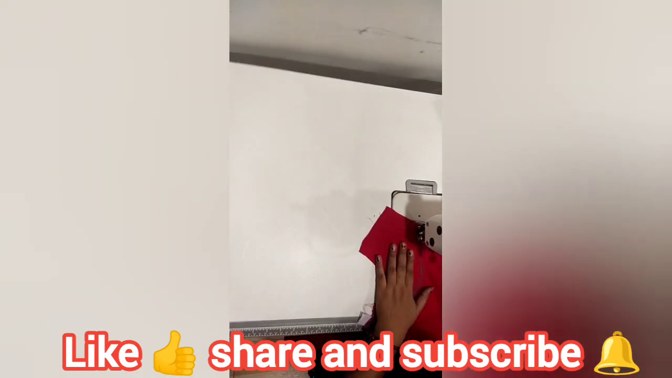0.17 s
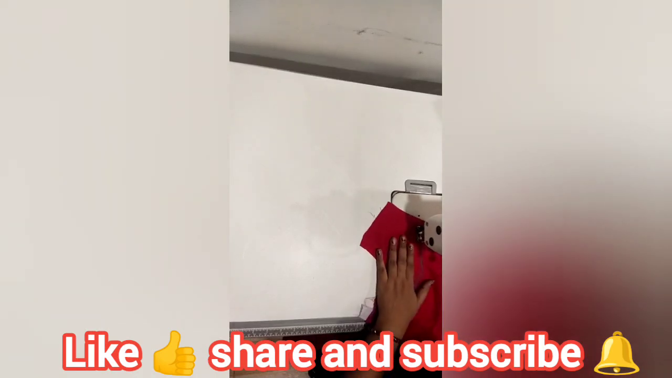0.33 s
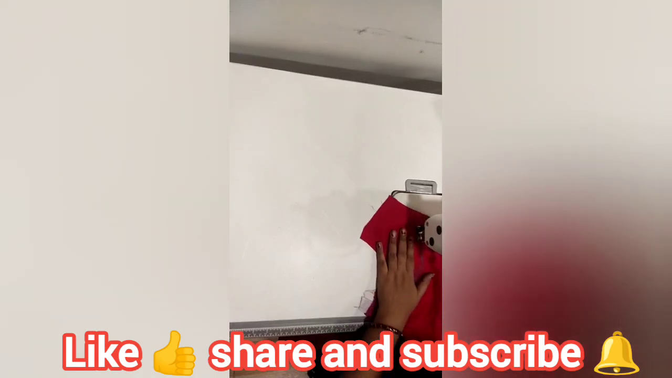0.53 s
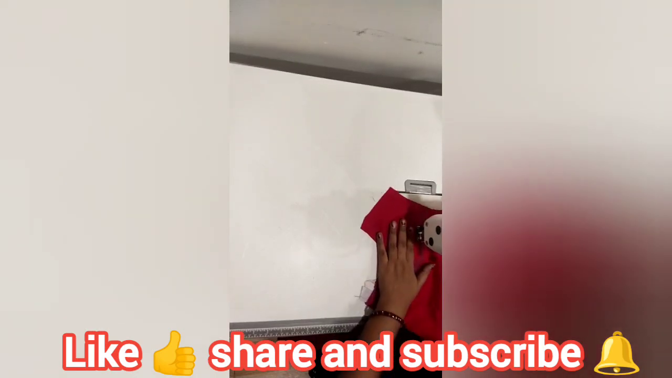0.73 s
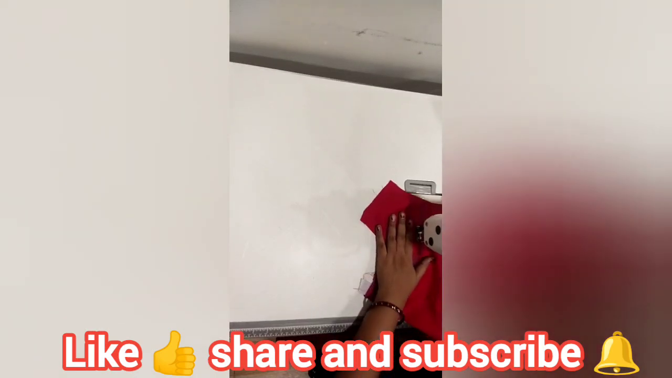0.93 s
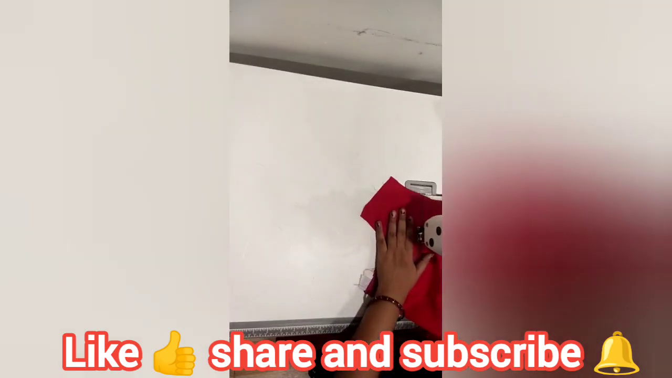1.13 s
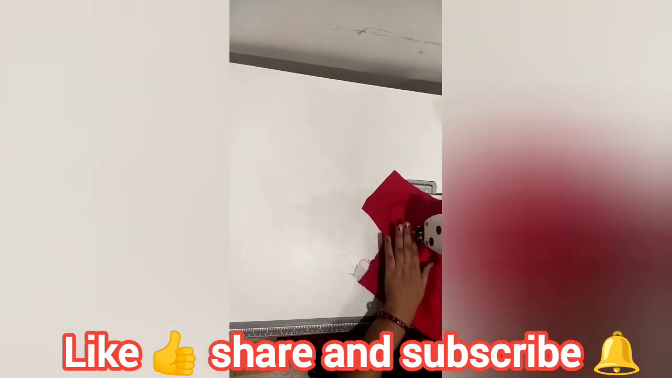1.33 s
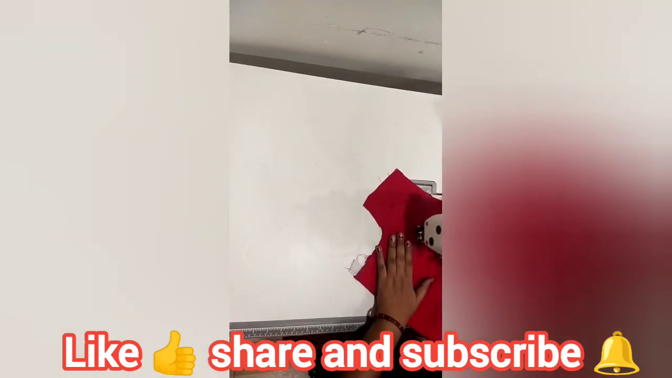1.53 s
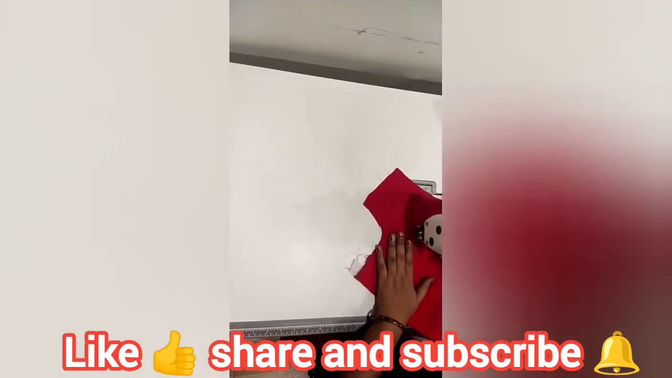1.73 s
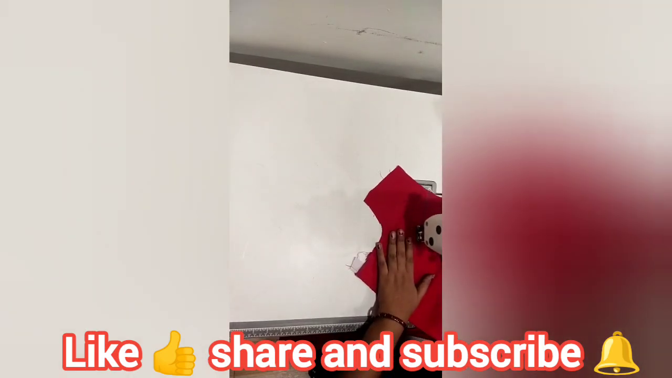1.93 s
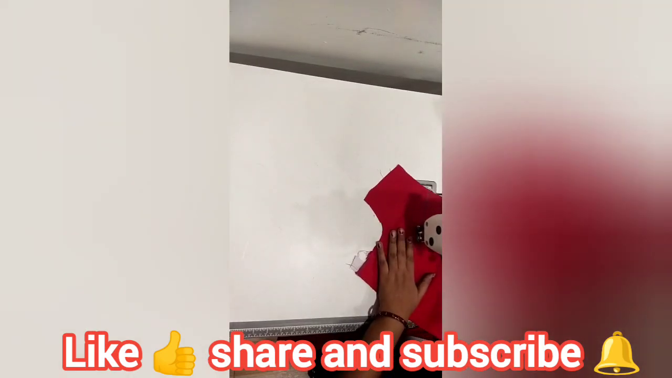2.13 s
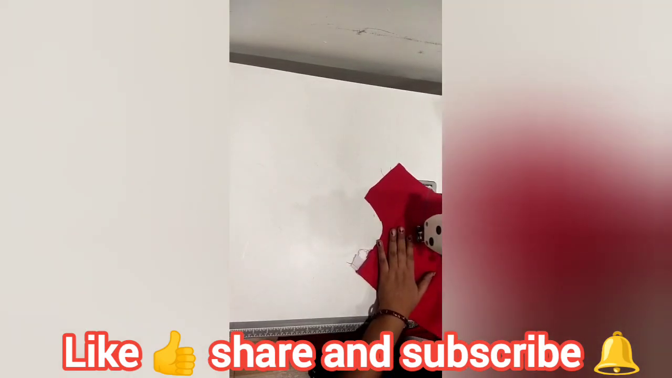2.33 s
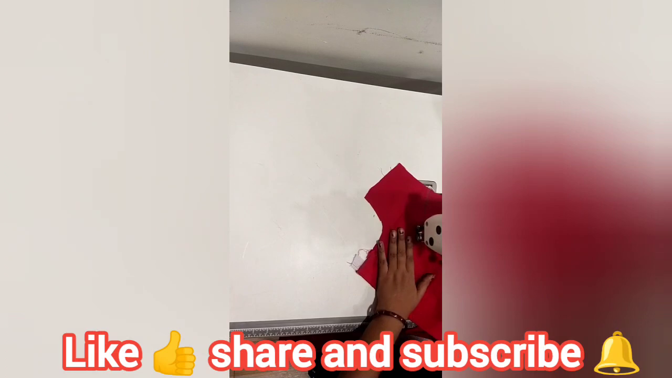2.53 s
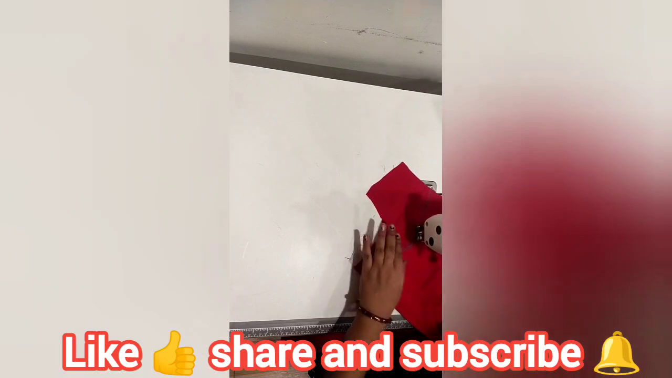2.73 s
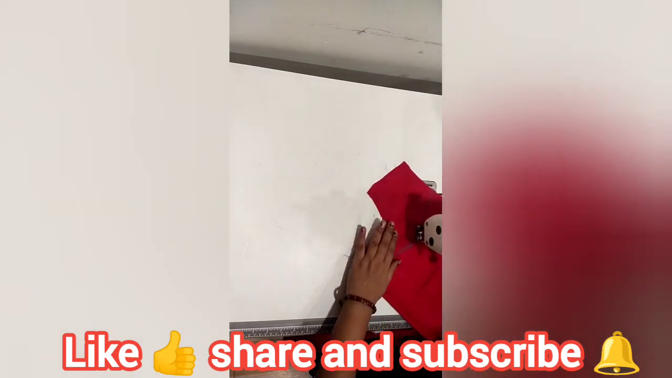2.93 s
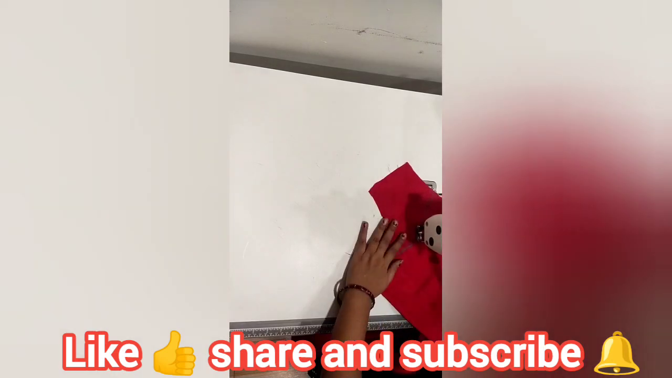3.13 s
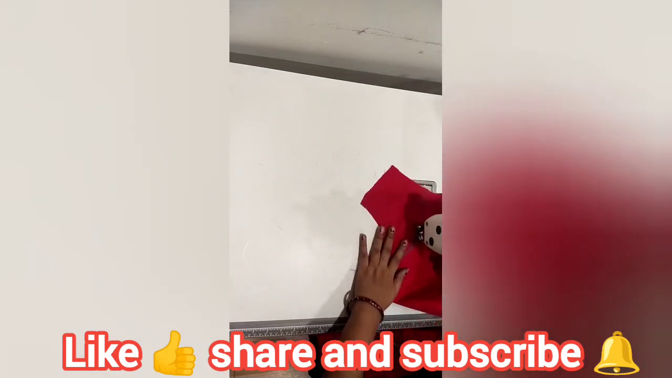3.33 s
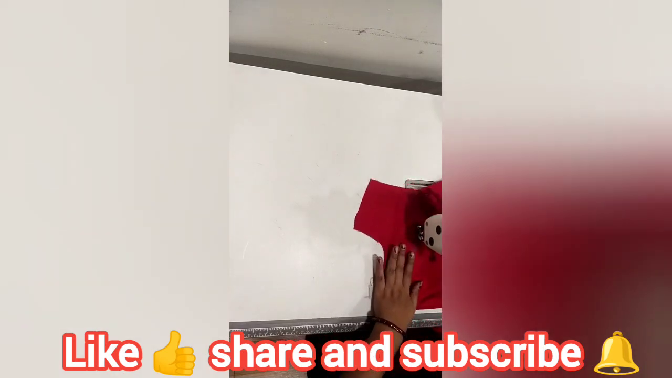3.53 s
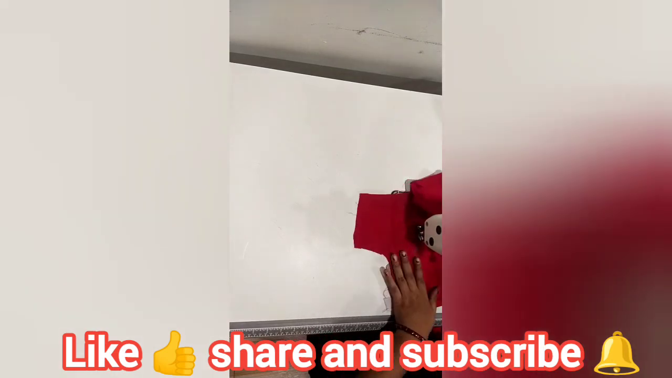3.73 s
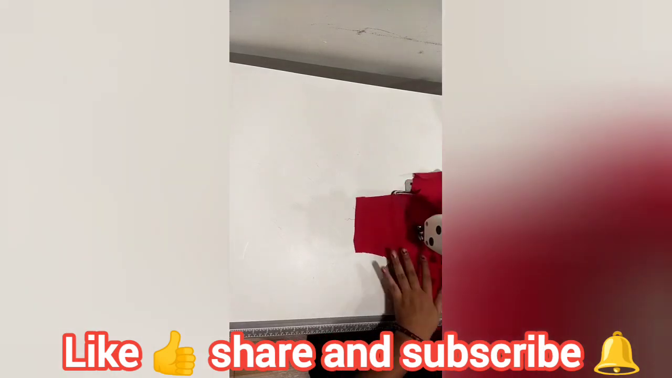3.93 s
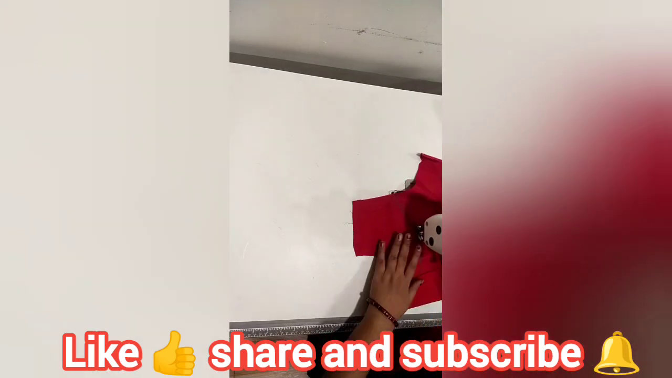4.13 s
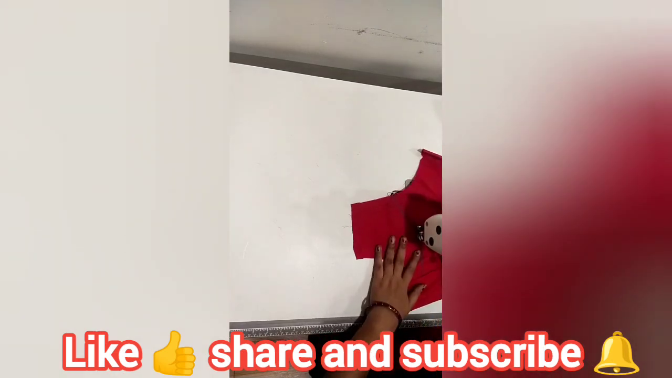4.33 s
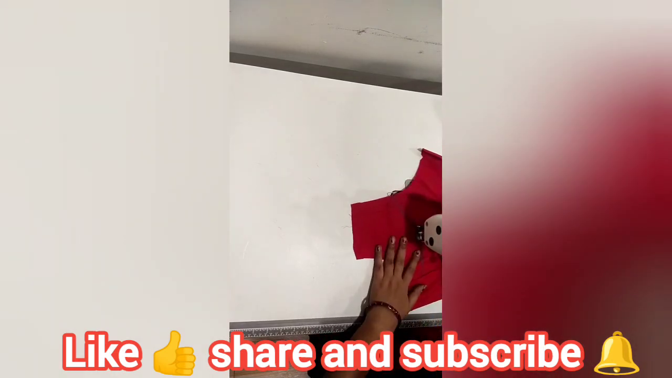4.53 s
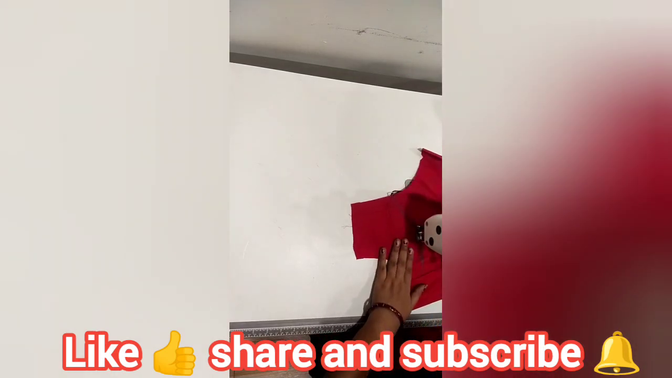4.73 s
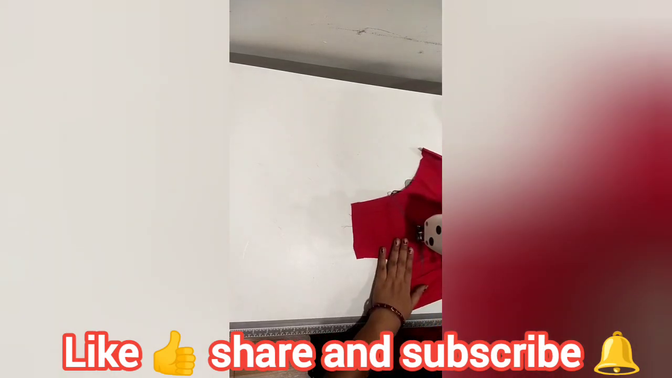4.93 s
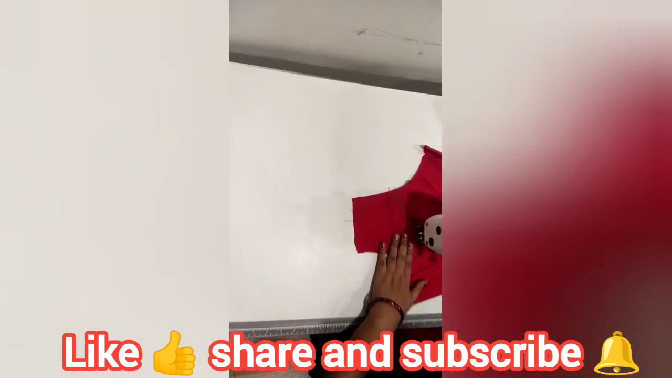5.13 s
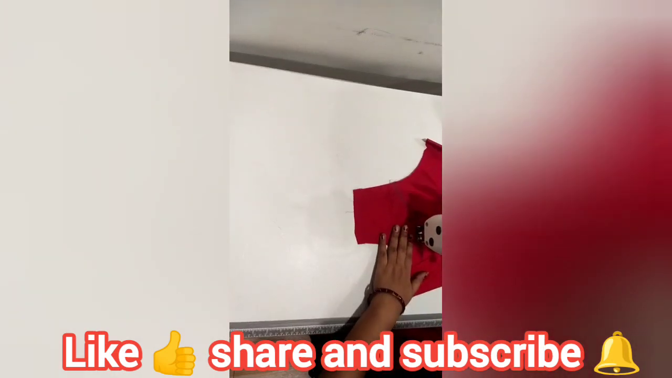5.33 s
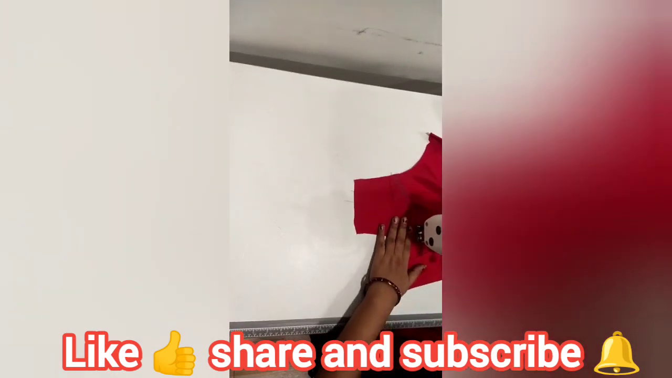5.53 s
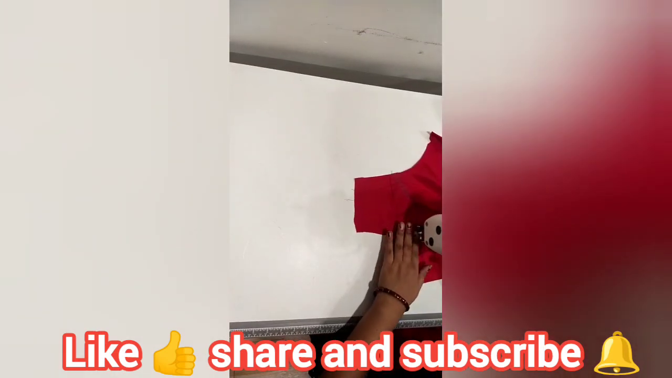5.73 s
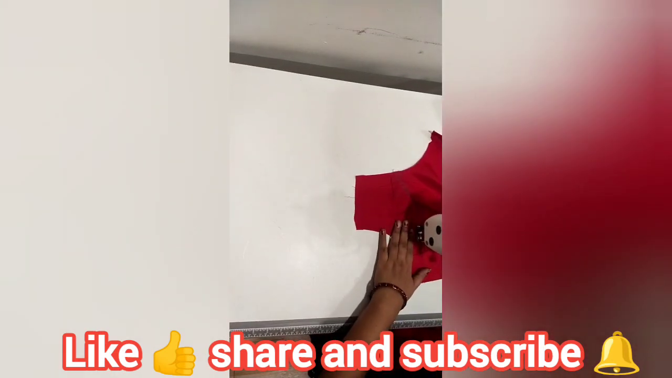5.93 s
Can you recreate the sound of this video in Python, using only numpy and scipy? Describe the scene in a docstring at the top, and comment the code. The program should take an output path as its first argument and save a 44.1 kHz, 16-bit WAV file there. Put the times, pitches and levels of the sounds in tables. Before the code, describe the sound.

Fast metallic stitching slows to a stop, a presser foot clacks, hands bump the table and slide fabric, then two brief motor runs follow.

```python
"""Sewing machine runs

An electric sewing machine on a table in a small room: one long run, a few slow stitches, then two short runs.
The motor drive is a sum of sine waves that hums through the table; the loose linkage is dense, patterned noise.
The needle bar ticks with short bursts of bright noise. Between the runs the presser foot clacks, hands bump
the table and knock the machine (noise and dying sine waves), cloth slides (shaped noise) and something squeaks.
"""
import sys
import numpy as np
from scipy import signal
from scipy.fft import rfft, irfft, next_fast_len
from scipy.io import wavfile
from scipy.ndimage import uniform_filter1d, map_coordinates

SR = 44100
rng = np.random.default_rng(int(sys.argv[2]) if len(sys.argv) > 2 else 0)


def wav_record(signal):
    """Record a signal, one row per channel, as 16-bit PCM in the file named by sys.argv[1]."""
    frames = np.transpose(np.atleast_2d(signal))
    bounded = np.clip(frames, -1, 1)
    # unit amplitude maps onto the largest positive 16-bit level
    quanta = np.round(bounded * 32767).astype(np.int16)
    wavfile.write(sys.argv[1], SR, quanta)


N = 267687


def amp(db):
    """Decibels to gain."""
    return 10 ** (np.asarray(db) / 20)


def unit(x):
    """Scale x to an rms of 1."""
    return x / np.sqrt(np.mean(x ** 2) + 1e-20)


def along(points, hz):
    """Read a curve of (f/Hz, value) points, with frequency on a log axis."""
    f, values = np.transpose(points)
    return np.interp(np.log(hz + 1), np.log(f + 1), values)


def wobble(rate):
    """A smooth random curve with a new random value `rate` times a second."""
    return map_coordinates(rng.standard_normal(int(N * rate / SR) + 4), [np.arange(N) * rate / SR])


def filtered(x, response):
    """Change the loudness or timing of each frequency in x."""
    padded = next_fast_len(x.shape[-1] + 8192)
    spectrum = rfft(x, padded) * response(np.fft.rfftfreq(padded, 1 / SR))
    return irfft(spectrum, padded)[..., :x.shape[-1]]


# How alike the left and right sides are: (f/Hz, likeness from 0 to 1)
LIKENESS = [(60, 1), (160, 1), (350, 0.87), (600, 1), (1000, 0.134), (2200, 0.25), (5000, 0.092),
            (15000, 0.26)]


def voiced(pair, spectrum, resonances=()):
    """Colour two unrelated sounds and mix them into a left and right pair of rms 1."""
    def response(hz):
        turn = np.arccos(np.clip(along(LIKENESS, hz), -1, 1)) / 2
        lift = sum(db / (1 + (2 * (hz - centre) / width) ** 2) for centre, width, db in resonances)
        return amp(along(spectrum, hz) + lift) * [np.cos(turn), np.sin(turn)]
    mid, side = filtered(pair, response)
    return unit(np.array([mid + side, mid - side]))


def noise(spectrum, size=N):
    """Stereo noise of rms 1 with the given spectrum."""
    return voiced(rng.standard_normal((2, size)), spectrum)


def panned(db):
    """Left and right gains; a positive value makes the left louder."""
    return amp(np.array([[.5], [-.5]]) * db)


def add(track, s, sound):
    """Mix a sound into the track at time s, in seconds."""
    part = track[:, max(round(s * SR), 0):][:, :sound.shape[-1]]
    part += sound[..., :part.shape[-1]]


# How long the room takes to fade by 60 dB: (f/Hz, fade time/s)
ROOM_FADE = [(150, 0.34), (600, 0.57), (2500, 0.39), (7000, 0.26), (15000, 0.17)]


def in_room(x, wet_db):
    """Add a new random room tail in which each frequency dies at its own speed."""
    hz, t, z = signal.stft(rng.standard_normal((2, SR // 2)), SR, nperseg=256)
    fading = z * amp(-60 * t / along(ROOM_FADE, hz)[:, None])
    tail = voiced(signal.istft(fading, SR, nperseg=256)[1], [(1, 0)])  # a flat spectrum
    tail = tail * (1 - np.exp(-np.arange(tail.shape[1]) / SR / 0.0063))
    wet = signal.fftconvolve(x, tail / np.linalg.norm(tail[0]), axes=1)
    return x + amp(wet_db) * wet[:, :x.shape[1]]


def ramp(start, full, release, stop):
    """An effort that rises evenly, holds, and runs down evenly, within 0 to 1."""
    t = np.arange(N) / SR
    return np.clip(np.minimum((t - start) / (full - start), (stop - t) / (stop - release)), 0, 1)


def arch(middle, length):
    """A smooth swell from nothing to 1 and back."""
    return np.cos(np.pi * np.clip((np.arange(N) / SR - middle) / length, -.5, .5)) ** 2


# The spectrum of the room's faint rush: (f/Hz, relative level/dB)
AIR_TONE = [(15, -51.5), (25, -21), (169, 1.5), (469, -7), (537, -7.5), (945, -10), (2630, -19),
            (5580, -31), (7100, -28), (8580, -36.5), (15500, -37)]


def room_rush():
    """Steady shaped noise stands for the faint rush of the room."""
    return amp(-61.0) * noise(AIR_TONE)


# Runs of the motor: (pedal down t/s, up to speed t/s, pedal up t/s, at rest t/s,
#                     top effort 0-1, speed/turns per s, one needle stroke t/s)
RUNS = [(-0.42, 0.193, 0.57, 1.2, 0.99, 13.28, 0.324), (4.821, 5.048, 5.326, 5.625, 0.95, 13.36, 5.096),
        (5.856, 6.12, 6.3, 6.6, 0.99, 13.4, 6.03)]


def motor_effort():
    """The motor's effort rises after the pedal goes down and falls after it comes up."""
    return sum(top * ramp(*times) for *times, top, _, _ in RUNS)


SAG_TURNS_PER_S = 0.3  # how much slower the drive turns at no effort
DROOP_TURNS_PER_S2 = 0.3  # the cloth drags the speed down, for up to 1 s after full speed


def shaft_turns(effort):
    """Turns made so far: each run has its own speed, which sags with low effort and with time."""
    t, speed = np.arange(N) / SR, np.zeros(N)
    for start, full, *_, rate, _ in RUNS:
        run_speed = rate - DROOP_TURNS_PER_S2 * np.clip(t - full, 0, 1)
        speed = np.where(t >= start, run_speed, speed)
    return np.cumsum(speed - SAG_TURNS_PER_S * (1 - effort)) / SR


RING_ON_S = 0.057  # time constant with which machine and room ring on


def driven(effort, db, power, tail_db):
    """The gain of a part that grows as a power of the effort and rings on after it."""
    energy, keep = effort ** (2 * power), np.exp(-1 / (RING_ON_S * SR))
    ringing = signal.lfilter([1 - keep], [1, -keep], energy)
    return amp(db) * np.sqrt(energy + amp(tail_db) ** 2 * ringing)


# Low and high vibration of the drive: (multiple of the turn rate, relative level/dB, left minus right/dB)
LOW_HUM = [(5, -19.5, -3), (10, -10, 18), (12, -8.5, 3), (13, 1.5, -2), (14, -6.5, 0.5), (15, -20.5, 9),
           (23, 4, -6.5)]
HIGH_HUM = [(28, 0, 0.5), (33, -11.5, -20), (37, -8, -1.5), (40, -11.5, -4.5), (41, 1.5, -2),
            (43, -11, -13), (46, -11.5, 14.5), (51, -14, -3.5)]
HUM_LAG_S = 0.029  # the high hum follows the effort this much later


def hum(turns, effort):
    """Unbalanced parts shake the table at multiples of the turn rate; high ones grow more steeply with effort."""
    t = np.arange(N) / SR
    late_effort = np.interp(t - HUM_LAG_S, t, effort)
    low = driven(effort, db=-43.5, power=1.7, tail_db=-4.5)
    high = driven(late_effort, db=-40, power=2.9, tail_db=-18.5)
    out = np.zeros((2, N))
    for level, orders in ((low, LOW_HUM), (high, HIGH_HUM)):
        for order, db, pan_db in orders:
            # both pitch and loudness are a little unsteady
            phase = 2 * np.pi * (order * turns + rng.random()) + 0.3 * wobble(14)
            out += panned(pan_db) * level * amp(db + 0.59 * wobble(22)) * np.sin(phase)
    return out


# Wave counts that make up the pattern of joint strikes: (waves per turn)
CHATTER_ORDERS = (3, 5, 7, 8, 10)


def chatter(turns):
    """The joints strike in the same pattern in every turn."""
    return unit(sum(np.cos(2 * np.pi * (order * turns + rng.random())) for order in CHATTER_ORDERS))


def contacts(pattern, swing_db, density, grain):
    """Noise and random tiny impacts (density per second) grow louder and softer with the pattern of the turn."""
    sparse = (rng.random(N) < density / SR) * rng.standard_normal((2, N))
    return amp(swing_db * pattern) * (rng.standard_normal((2, N)) + grain * unit(sparse))


def patches(x, depth_db, size=5):
    """The energy is shared among the frequencies anew all the time, so the colour flickers."""
    z = signal.stft(x, nperseg=1024)[2]
    over_hz = uniform_filter1d(rng.standard_normal(z.shape[1:]), size, 0)
    field = uniform_filter1d(over_hz, 3, 1)  # smoothed over time too
    return unit(signal.istft(z * amp(depth_db * unit(field)), nperseg=1024)[1][:, :N])


def near_walls(x, echo_db, spread, count=8):
    """Table top, casting and walls send a few early copies to each side, combing the spectrum."""
    out = x.copy()
    for side in range(2):
        delays = rng.uniform(.001, spread, count)  # seconds
        for delay, sign in zip(delays, rng.choice([-1, 1], count)):
            out[side] += sign * amp(echo_db) * np.pad(x[side], (round(delay * SR), 0))[:N]
    return out / np.sqrt(1 + count * amp(echo_db) ** 2)


# Spectra of the steel rattle, the casting and the drumming table: (f/Hz, relative level/dB)
RATTLE_TONE = [(2500, -34), (4000, -3), (5000, 1), (5900, -4), (7300, 3.5), (8800, -6), (9900, -6.5),
               (11200, -5.5), (13500, -7), (15000, -3), (16000, -21.5)]
CASTING_TONE = [(400, -17.5), (750, -3), (1100, -4), (1700, 1), (2200, -2.5), (3000, -1), (4300, -4),
                (5500, -25.5), (9000, -32)]
TABLE_TONE = [(25, -23), (52, -16), (68, -4.5), (100, -2.5), (140, -1.5), (180, 6.5), (230, -7.5),
              (300, -10.5), (480, -6.5), (580, 4.5), (720, -11.5), (1100, -22), (3000, -65.5)]
# Resonances of the machine bed: (f/Hz, width/Hz, lift/dB)
BED_RESONANCES = [(170.4, 8.3, -1.5), (293.7, 37, 16.5), (390, 40, 6.5), (600, 36, 3), (640, 65, 0.5)]


def linkage(turns, effort, resonances, rattle_db, casting_db, table_db, uneven_db):
    """The loose linkage rattles, rings the casting and drums on the table, with an uneven level."""
    rattle = driven(effort, rattle_db, power=1.286, tail_db=-25)
    casting = driven(effort, casting_db, power=1.124, tail_db=-12)
    # at speed most of the table's motion goes into the hum, so its drumming grows more slowly
    drumming = driven(effort, table_db, power=0.85, tail_db=-4)
    pattern = chatter(turns)
    steel_hits = contacts(pattern, swing_db=0.95, density=1800, grain=0.82)
    body_hits = contacts(pattern, swing_db=0.85, density=600, grain=0.58)
    wood_hits = contacts(pattern, swing_db=1.0, density=220, grain=0.34)
    steel = rattle * patches(voiced(steel_hits, RATTLE_TONE, resonances), depth_db=2.5)
    body = casting * patches(voiced(body_hits, CASTING_TONE, resonances), depth_db=2.5)
    wood = drumming * voiced(wood_hits, TABLE_TONE, BED_RESONANCES + resonances)
    return amp(uneven_db * wobble(35)) * (near_walls(steel + body, echo_db=-17.5, spread=.02) + wood)


# Ringing metal in the fast runs: (f/Hz, width/Hz, lift/dB)
FAST_RESONANCES = [(995, 30, 1.5), (1460, 46, 5), (1802, 36, 8), (2020, 20, -0.5), (2630, 81, 7.5),
                   (2972, 34, 12), (3400, 77, 3.5), (4540, 95, 6.5), (5213, 40, 2), (7270, 26, -8.5),
                   (8660, 120, 3.5), (8850, 150, 9.5)]


def fast_linkage(turns, effort):
    """The motor drives the linkage at speed, so the rattle is fairly even."""
    return linkage(turns, effort, FAST_RESONANCES,
                   rattle_db=-35, casting_db=-35.5, table_db=-40.5, uneven_db=0.27)


# Needle bar ticks in every turn at speed: (share of the turn, relative level/dB at full effort)
STROKE = [(0.0, -20.5), (0.39, -25.5), (0.6, -24)]
STROKE_SCATTER_DB = 2
STROKE_MIN_EFFORT = 0.66  # the regular ticks need more effort than this


def stroke_ticks(turns, effort):
    """In a fast run the needle bar ticks at the same places in every turn: (t/s, level/dB, left minus right/dB)."""
    t, rows = np.arange(N) / SR, []
    for start, _, _, stop, *_, stroke_s in RUNS:
        fast = (t > start) & (t < stop) & (effort > STROKE_MIN_EFFORT)
        angle = turns - np.interp(stroke_s, t, turns)
        for share, db in STROKE:
            passes = np.flatnonzero((np.diff(np.floor(angle - share)) > 0) & fast[1:])
            for i in passes:
                level = db + 20 * np.log10(effort[i]) + rng.normal(0, STROKE_SCATTER_DB)
                rows.append((t[i], level, 0))
    return rows


# Single ticks as the slow linkage takes up its play: (t/s, relative level/dB, left minus right/dB)
SLOW_TICKS = [(0.8844, -29, -8), (0.945, -37, -11), (0.9866, -34, -8), (0.995, -35, -9), (1.0837, -33, -1),
              (1.5703, -34, 0), (1.6217, -34, -2), (1.7595, -26.5, -3), (1.7818, -25.5, 0),
              (1.8761, -30.5, 2), (1.931, -28.5, 0), (1.9485, -33.5, -5), (1.9928, -25, -1.5),
              (2.0868, -26, -3), (2.2193, -41.5, 2), (4.487, -59, 0), (4.8121, -37.5, 5), (4.8615, -29, 0),
              (4.8911, -25.5, 1), (4.9432, -21, 4), (5.4829, -24, -1), (5.8799, -31, 1), (5.9575, -31, 2),
              (5.9954, -26.5, -3)]
# The spectrum of a tick: (f/Hz, relative level/dB)
TICK_TONE = [(300, -35.5), (1200, -6.5), (3000, -4), (5500, -7.5), (7200, 0.5), (8000, -2), (8700, 5.5),
             (9900, -16), (11000, -6), (13000, -13), (15000, -2), (16500, -22.5)]


def ticks(turns, effort):
    """Steel meets steel: a few milliseconds of bright noise, with a room tail."""
    out, t = np.zeros((2, N)), np.arange(SR // 20) / SR
    for s, db, pan_db in SLOW_TICKS + stroke_ticks(turns, effort):
        shape = (1 - np.exp(-t / 0.0008)) * amp(-60 * np.maximum(t - .0025, 0) / 0.025)
        add(out, s, amp(db - 6.5) * panned(pan_db) * shape * noise(TICK_TONE, size=len(t)))
    return in_room(out, wet_db=-6)


# Light knocks on the machine bed: (t/s, relative level/dB, ringing f/Hz, time to fade 60 dB/s)
KNOCKS = [(1.157, -43, 680, 0.058), (1.782, -50, 375, 0.062), (1.83, -45, 400, 0.092),
          (1.877, -46.5, 377, 0.08), (2.133, -48.5, 597, 0.19), (2.620, -50, 544, 0.16),
          (2.85, -49, 326, 0.13), (3.609, -36.5, 475, 0.021), (4.306, -43.5, 550, 0.038),
          (4.496, -44.5, 542, .04), (4.632, -33.5, 594, 0.049), (4.921, -37.5, 569, 0.21),
          (5.469, -32, 581, 0.11)]
# The spectrum of the dull tap: (f/Hz, relative level/dB)
KNOCK_TONE = [(30, -40), (100, -16), (330, 3), (700, -10), (1100, -13), (2200, -26.5), (6000, -41),
              (15000, -61)]


def knocks():
    """A dull tap of noise with one short ring of the bed."""
    out, t = np.zeros((2, N)), np.arange(SR // 2) / SR
    for s, db, hz, fade_s in KNOCKS:
        ring = amp(3 - 60 * t / fade_s) * np.sin(2 * np.pi * hz * t)
        tap = amp(-6.5 - 60 * t / 0.054) * noise(KNOCK_TONE, size=len(t))
        onset = 1 - np.exp(-t / 0.0025)
        add(out, s, amp(db) * (onset * ring + in_room(onset * tap, wet_db=3.5)))
    return out


# The presser foot and its lever: (t/s, relative level/dB, brightness/dB per tenfold frequency)
CLACKS = [(1.359, -31.5, -4.5), (1.4, -30, 5), (1.418, -38.5, 6), (1.428, -43, 3), (1.476, -46, 10),
          (2.843, -43, 8), (2.855, -42, 0.5), (2.871, -41.5, 2.5), (4.071, -34, 12.5), (4.092, -33.5, 11),
          (4.112, -37.5, -9), (4.131, -39, 6), (4.217, -41.5, -4)]
# The spectrum of the lever's crack: (f/Hz, relative level/dB)
LEVER_TONE = [(30, -50), (90, -24), (170, -5), (350, -9), (850, -2), (1050, -17.5), (1450, -14.5),
              (1850, -5.5), (2600, -9), (3200, -22), (3600, -16), (4600, -21.5), (5800, -33), (7500, -22.5),
              (9800, -39.5), (15000, -39)]
# Ringing modes of the machine head: (f/Hz, relative level/dB, time to fade 60 dB/s)
HEAD_MODES = [(296.7, 0.5, 0.18), (386, -3, 0.44), (466, -38, 0.37), (550, -4.5, 0.4), (657, -3, 0.22),
              (816, 1.5, 0.16), (855, -17, 0.64), (1268.5, -11.5, 1), (1850, -16, 0.2), (2410, -6.5, 0.15),
              (2510, -7, 0.12), (2695, -21, 0.26), (3680, -14, 0.17)]


def clacks():
    """The presser foot snaps against its stop and bounces; the whole head rings."""
    out, t = np.zeros((2, N)), np.arange(SR // 2) / SR
    for s, db, bright_db in CLACKS:
        tone = [(hz, level + bright_db * np.log10(hz / 1000)) for hz, level in LEVER_TONE]
        # the foot chatters on its stop for a moment before it lets go
        crack = amp(-2.0 - 60 * np.maximum(t - .003, 0) / 0.018) * noise(tone, size=len(t))
        ring = np.zeros((2, len(t)))
        for hz, level, fade_s in HEAD_MODES:
            # each mode has its own strength and reaches the two sides a little out of step
            fade = amp(level + rng.normal(0, 1.93) - 60 * t / fade_s)
            ring += fade * np.sin(2 * np.pi * (hz * t + rng.random()) + rng.normal(0, 0.39, (2, 1)))
        onset = 1 - np.exp(-t / 0.002)
        add(out, s, amp(db) * (in_room(onset * crack, wet_db=1.5) + amp(-12) * onset * ring))
    return out


# The wheel is eased round slowly: (starts t/s, moving t/s, let go t/s, at rest t/s, effort level/dB)
INCHES = [(1.52, 1.54, 1.62, 2.13, -19.5), (1.732, 1.817, 1.914, 2.187, -10), (2.077, 2.1, 2.084, 2.3, -12),
          (4.73, 4.748, 4.82, 8.1, -26), (5.497, 5.58, 5.6, 5.75, -36)]
# Ringing metal in the slow stitches: (f/Hz, width/Hz, lift/dB)
SLOW_RESONANCES = [(319, 140, 10.5), (554, 85, 7), (1305, 190, 18), (1790, 48, 7), (3110, 820, 11),
                   (3830, 47, 8.5), (5040, 44, 7), (6200, 56, 7), (6800, 52, 12), (7400, 300, 2),
                   (8400, 206, 10)]


def slow_linkage(turns):
    """The wheel is eased round, and the linkage rattles much more unevenly than at speed."""
    easing = sum(amp(db) * ramp(*times) for *times, db in INCHES)
    return linkage(turns, easing, SLOW_RESONANCES,
                   rattle_db=-32.0, casting_db=-36.5, table_db=-47, uneven_db=2.28)


# Slides of cloth and hand: (middle t/s, length/s, relative hiss level/dB, relative rub level/dB)
SLIDES = [(2.302, 0.9, -73.5, -60), (2.754, 0.57, -81.5, -62), (3.334, 1.3, -67, -68.5),
          (3.28, 0.52, -90, -55.5), (4.334, 0.36, -85, -52), (4.653, 0.68, -79, -55.5)]
# Spectra of the hiss and the rub: (f/Hz, relative level/dB)
CLOTH_HISS = [(1200, 4.5), (3300, -3.5), (5000, -6.5), (6800, 0.5), (8200, -2.5), (12000, -7),
              (15200, -2.5)]
CLOTH_RUB = [(35, -63), (60, -42), (139, 1), (263, -27), (308, -8.5), (330, -21), (702, -14.5), (1980, -32),
             (4000, -37), (5200, -37), (8800, -120)]


def cloth():
    """Cloth and hand slide over the smooth table top: an even hiss and a more uneven rub."""
    hiss = sum(amp(db) * arch(middle, length) for middle, length, db, _ in SLIDES)
    rub = sum(amp(db) * arch(middle, length) for middle, length, _, db in SLIDES)
    hissing = hiss * amp(5 + 0.8 * wobble(25)) * noise(CLOTH_HISS)
    rubbing = rub * amp(-4 + 3.0 * wobble(18)) * noise(CLOTH_RUB)
    return hissing + rubbing


# Soft bumps on the table: (t/s, relative level/dB, pitch factor)
BUMPS = [(2.173, -31.5, 1.02), (2.242, -39.5, 1.1), (2.349, -32.5, 1.04), (2.383, -36, 1.06),
         (2.439, -39.5, 1.0), (2.567, -33.5, 1.02), (2.603, -42, 1.05), (3.204, -44, 0.95),
         (3.261, -49, 0.89), (3.557, -46, 0.96), (3.612, -33.5, 1.0), (3.673, -39.5, 1.0),
         (3.789, -47, 1.02), (3.898, -45, 1.02), (4.322, -44, 0.9), (4.481, -43.5, 0.92), (4.573, -53, 0.9)]
# Low modes of the table top: (f/Hz before the pitch factor, relative level/dB, time to fade 60 dB/s)
BOARD_MODES = [(128.2, -14, 0.29), (156.2, 0.5, 0.13), (210, -16, 0.061), (281.5, -15.5, 0.11),
               (377, -28.5, 0.13)]


def bumps():
    """Soft blows wake only the low modes of the table top; the hand's weight shifts their pitch."""
    out, t = np.zeros((2, N)), np.arange(SR // 2) / SR
    for s, db, pitch in BUMPS:
        ring = np.zeros(len(t))
        for hz, level, fade_s in BOARD_MODES:
            fade = amp(level + rng.normal(0, 1.6) - 60 * t / fade_s)
            ring += fade * np.sin(2 * np.pi * hz * pitch * rng.normal(1, 0.021) * t)
        swell = (1 - np.exp(-t / .004)) ** 3
        add(out, s, in_room(amp(db + 2) * panned(-.7) * ring * swell, wet_db=-8.5))
    return out


# The faint squeak: (middle t/s, length/s, level/dB)
SQUEAK = (2.647, 0.28, -66.5)
# Its notes: (f/Hz, relative level/dB)
SQUEAK_NOTES = [(2110, 2), (2700, -2), (2900, -8)]


def squeak():
    """A dry contact sings faintly on a few wavering notes."""
    t = np.arange(N) / SR
    middle, length, level_db = SQUEAK
    notes = np.zeros((2, N))
    for hz, db in SQUEAK_NOTES:
        waver = 2.0 * np.array([wobble(45), wobble(42)])  # each side wavers by itself
        notes += amp(db) * np.sin(2 * np.pi * hz * t + waver)
    return amp(level_db) * arch(middle, length) * notes


# Stereo balance of the linkage and the ticks: (f/Hz, left minus right/dB)
LEAN = [(100, -2), (600, -2), (1500, -1.5), (4000, 0), (6000, 2.5), (7400, -3), (8800, -5.5), (10000, -1),
        (12000, 0.5), (15000, 4.5)]
LAG_S = 0.000324  # the left side hears the machine and the handling this much later


def scene():
    """The work lies a little to the right; the hum comes from the whole table, under the room's faint rush."""
    effort = motor_effort()
    turns = shaft_turns(effort)
    background = room_rush() + hum(turns, effort)
    stitching = fast_linkage(turns, effort) + ticks(turns, effort) + slow_linkage(turns)
    handling = knocks() + clacks() + cloth() + bumps() + squeak()
    machine = filtered(stitching, lambda hz: panned(along(LEAN, hz)))
    # half the lag delays the left, the other half brings the right forward
    placed = filtered(machine + handling, lambda hz: np.exp(1j * np.pi * hz * LAG_S * np.array([[-1], [1]])))
    return placed + background


TOP_HZ = 15700  # upper band limit


def record(dry):
    """The microphone loses the deepest bass, and a very steep filter cuts what lies above the band limit."""
    thin = signal.sosfilt(signal.butter(2, 55, "highpass", fs=SR, output="sos"), dry)
    return filtered(thin, lambda hz: 1 / np.sqrt(1 + (hz / TOP_HZ) ** 160))


dry = scene()
out = record(dry)
wav_record(out)
```